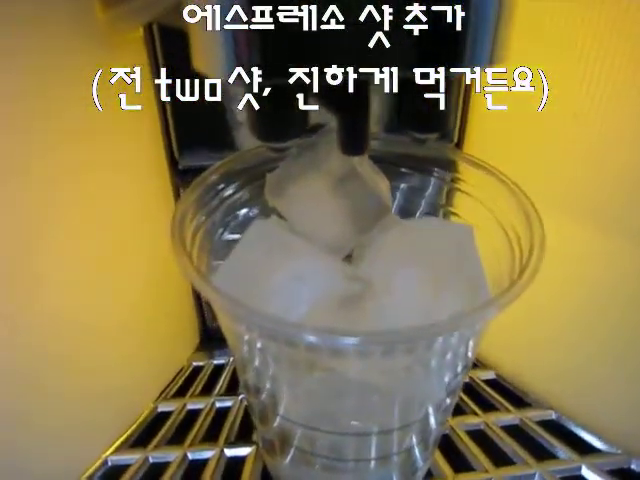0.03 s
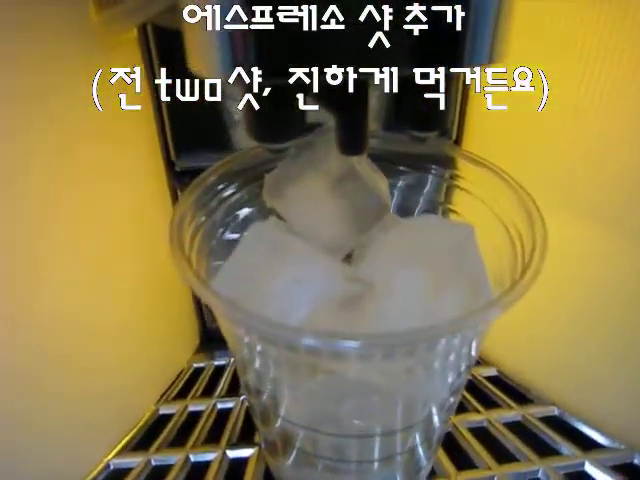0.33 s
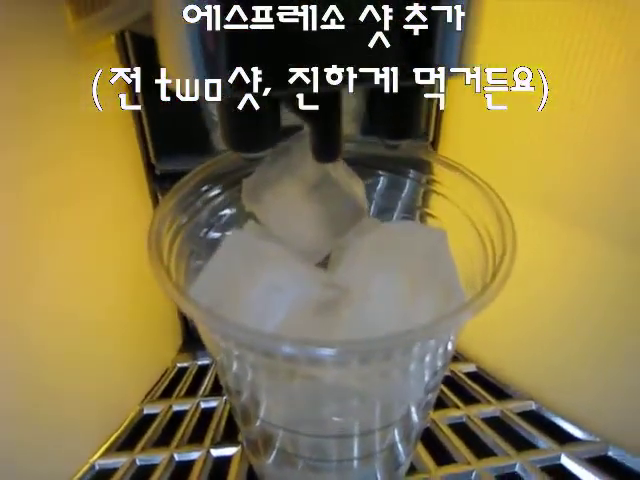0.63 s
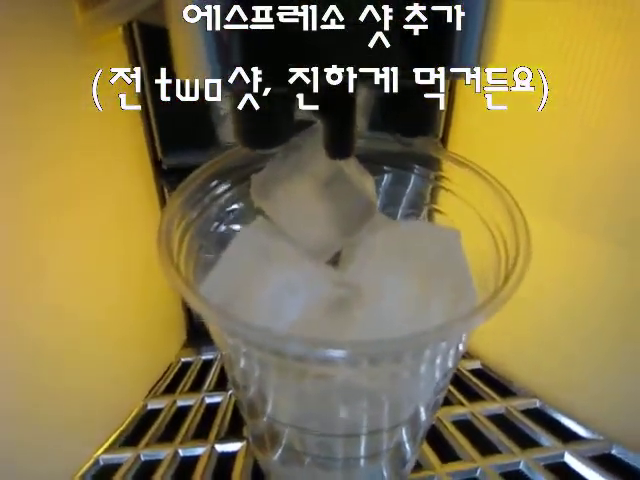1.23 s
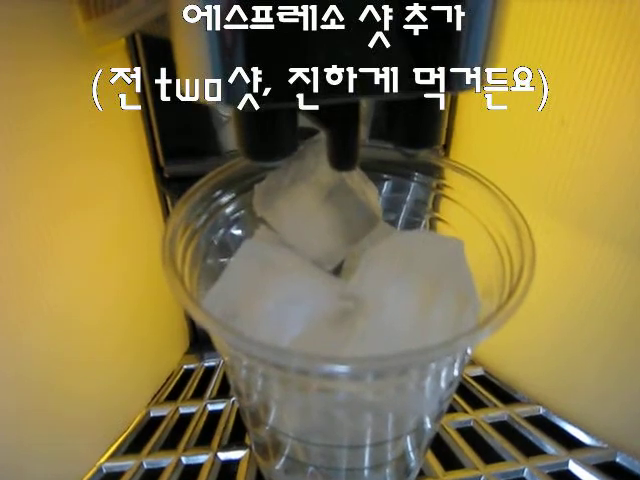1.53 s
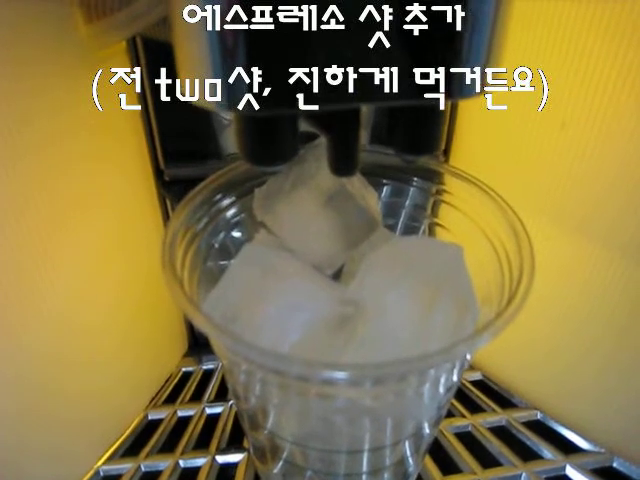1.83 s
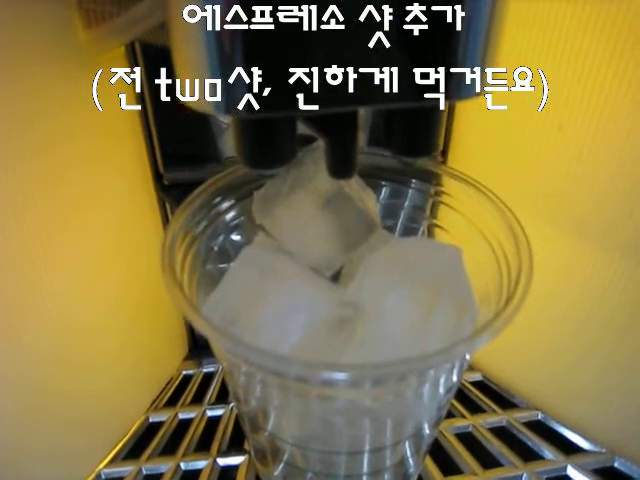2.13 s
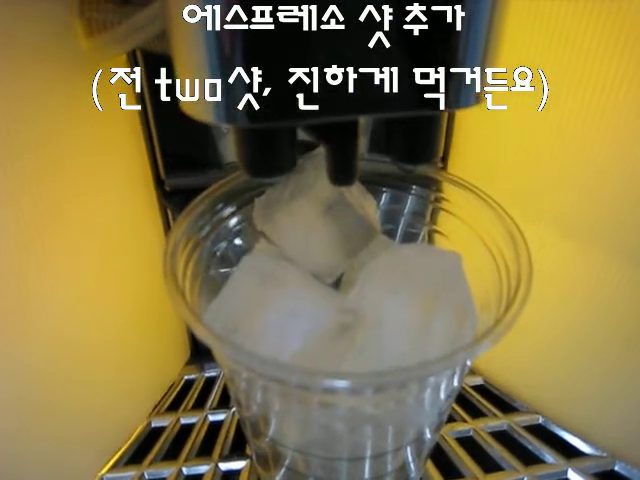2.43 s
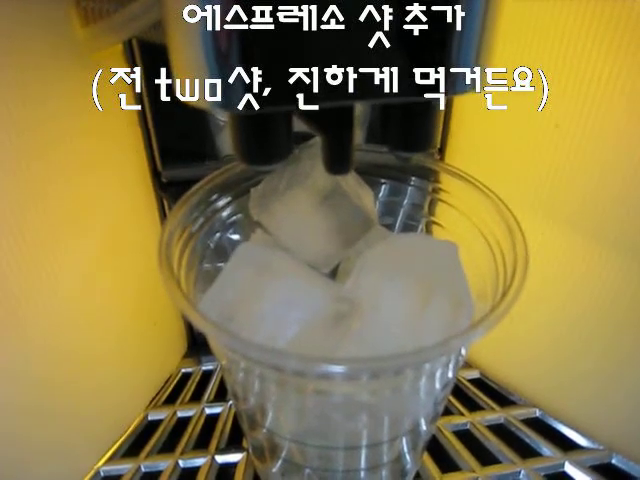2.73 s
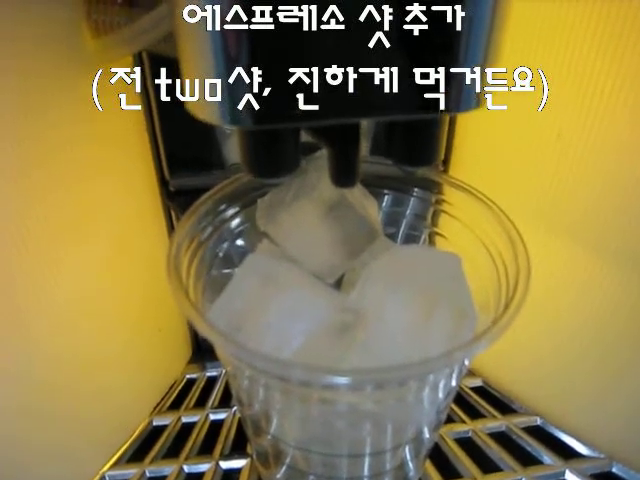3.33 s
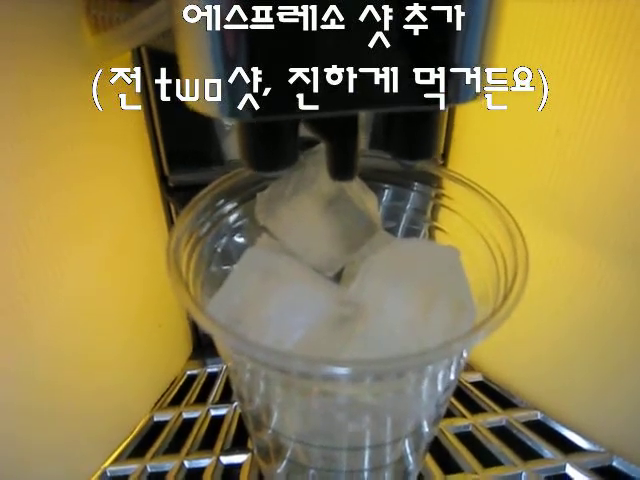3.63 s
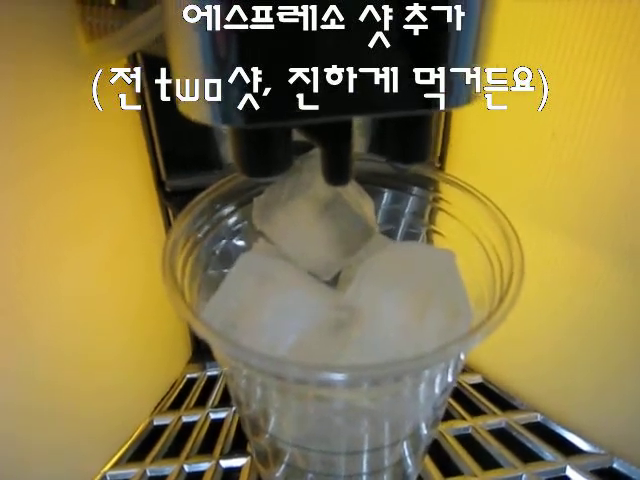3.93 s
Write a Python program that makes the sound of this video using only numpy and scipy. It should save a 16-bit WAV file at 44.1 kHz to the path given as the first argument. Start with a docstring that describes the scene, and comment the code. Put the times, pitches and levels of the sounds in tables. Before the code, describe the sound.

A coffee machine grinds beans with a dense crunch and rough drone, then runs down to a faint fan rush. Latches clunk, a small geared motor whirrs, and one knock follows, heard close up in a small room.

```python
"""A dense crunch of coffee beans and a rough burr drone, heard beside the cup of a bean-to-cup machine.
The grinder runs down, leaving the rush and thin whistle of a cooling fan. Latches click, the brew
unit clunks into motion, and a small geared motor whirrs with buzzing brushes and humming gears;
the unit knocks once more on its way. Crunch and gears ring the plastic housing, the clunks a small room."""
import sys
import numpy as np
from scipy import signal
from scipy.fft import rfft, irfft, next_fast_len
from scipy.io import wavfile
from scipy.ndimage import map_coordinates

SR = 44100
rng = np.random.default_rng(int(sys.argv[2]) if len(sys.argv) > 2 else 0)


def output_pcm(signal):
    """Save a mono or channel-first signal as 16-bit PCM at the path in sys.argv[1].

    Samples are clipped to [-1, 1] before scaling.
    """
    pcm = np.clip(np.atleast_2d(signal).T, -1, 1) * 32767
    wavfile.write(sys.argv[1], SR, np.round(pcm).astype(np.int16))


N = 176400
KNOCK_S = 3.4197  # the brew unit hits a stop


def amp(db):
    """Decibels to gain."""
    return 10 ** (np.asarray(db) / 20)


def unit(x):
    """Scale to rms 1."""
    return x / np.sqrt(np.mean(x ** 2) + 1e-20)


def along(points, hz):
    """Read (f/Hz, value) points at hz, on a log frequency axis."""
    f, values = np.transpose(points)
    return np.interp(np.log(hz + 1), np.log(f + 1), values)


def curves(rows):
    """Automation: one value per sample for each column after the time."""
    times, *columns = np.transpose(rows)
    return [np.interp(np.arange(N) / SR, times, column) for column in columns]


def wobble(rate):
    """Smooth random modulation, rate knots a second."""
    coarse = np.arange(0, N + 64, 64)
    knots = rng.standard_normal(1024)
    return np.interp(np.arange(N), coarse, map_coordinates(knots, [coarse * rate / SR], mode="wrap"))


def coloured(x, colour):
    """Minimum-phase EQ with a gain of colour(hz) dB: resonances ring only after a hit."""
    size = 2 * next_fast_len(N * 2 // 3)
    cepstrum = irfft(np.log(amp(colour(np.fft.rfftfreq(size, 1 / SR)))), size)
    cepstrum[1:size // 2] *= 2
    cepstrum[size // 2 + 1:] = 0
    return irfft(rfft(x, size) * np.exp(rfft(cepstrum)), size)[:N]


def noise(points):
    """Noise of rms 1, shaped by (f/Hz, level/dB) points."""
    return unit(coloured(rng.standard_normal(N), lambda hz: along(points, hz)))


def room(x, wet_db):
    """A small room adds a diffuse tail whose treble dies first."""
    # reverb decay: f/Hz, t60/s
    decay = [(150, 0.55), (1000, 0.18), (4000, 0.13), (12000, 0.086)]
    hz, t, spectra = signal.stft(rng.standard_normal(SR // 2), SR, nperseg=256)
    tail = signal.istft(spectra * amp(-60 * t / along(decay, hz)[:, None]), SR, nperseg=256)[1]
    return x + amp(wet_db) * signal.fftconvolve(x, tail / np.linalg.norm(tail))[:N]


def resonance(hz, centre, width):
    """Bell curve of one resonance, 1 at its centre."""
    return 1 / (1 + (2 * (hz - centre) / width) ** 2)


def housing(hz):
    """Boost in dB where the plastic housing rings."""
    # housing resonances: f/Hz, width/Hz, boost/dB
    modes = [(187, 24, 8), (277, 20, 4), (329, 18, 7), (365, 20, 5), (563, 28, 5), (637, 26, 7),
             (802, 36, 6), (1124, 22, 7), (1178, 32, 6), (1458, 24, 5), (1615, 40, 4), (1723, 26, 6),
             (2290, 110, 5), (2648, 26, 6), (3070, 190, 7), (3620, 320, 6), (7950, 900, 4), (9700, 120, 5)]
    return sum(db * resonance(hz, f, width) for f, width, db in modes)


def ripple(depth_db, spacing_hz=55):
    """Dense, static peaks and dips of the housing, as (f/Hz, level/dB) rows."""
    hz = np.arange(0, SR / 2, spacing_hz)
    return np.transpose([hz, depth_db * np.clip(rng.standard_normal(len(hz)), -2, 1)])


def fan():
    """A cooling fan lays a steady bed of rushing air and a thin, wavering whistle."""
    # air spectrum: f/Hz, level/dB
    air_colour = [(25, -27.5), (174, -16.5), (200, -6), (572, -17.5), (620, -4.5), (1120, -20), (1320, -12),
                  (1550, -21), (1730, -19.5), (15800, -51.5)]
    # fan tones: f/Hz, level/dB
    tones = [(1341.4, -41.5), (455, -46)]
    t = np.arange(N) / SR
    whistle = sum(amp(db + wobble(7.22)) * np.sin(2 * np.pi * hz * t + 0.32 * wobble(20))
                  for hz, db in tones)
    return amp(-36.5) * noise(air_colour) + np.sqrt(2) * whistle


def motor():
    """Brushes buzz at multiples of the shaft speed, each overtone swelling as it glides through a
    resonance; gears hum and whine, sliding parts rub, and the brushes sizzle once a turn."""
    # shaft speed: t/s, f/Hz
    shaft_speed = [(2.66, 94), (2.72, 96.8), (2.79, 96.3), (2.85, 98.5), (2.96, 98.6), (3.0, 100),
                   (3.08, 100.7), (3.17, 100.1), (3.26, 100.8), (3.33, 103.5), (3.4, 105.2), (3.5, 105.8),
                   (3.68, 107), (3.8, 105.8), (3.88, 104.7)]
    # faders: t/s, whirr level/dB, gear hum level/dB, whistle level/dB
    faders = [(2.55, -90, -90, -90), (2.58, -45, -60, -80), (2.72, -36.5, -31.5, -51),
              (2.86, -36, -31, -47), (2.96, -36, -32.5, -46), (3.08, -36, -31.5, -43),
              (3.23, -36, -29.5, -44), (3.33, -36, -34, -51), (3.5, -36, -40, -47), (3.7, -37, -40, -45),
              (3.8, -36.5, -36.5, -47), (3.86, -36, -35, -53), (4.0, -35, -34, -52)]
    # low gear hum and higher whine: multiples of the shaft speed
    hum_orders = [5, 6, 7, 8, 9]
    whine_orders = [16, 24, 30, 41]
    # trim of each of those tones: level/dB before the knock, level/dB after it
    hum_trims = [(-12, -5), (-22, -12), (-1.5, -1), (-5.5, -10), (-11, -19)]
    whine_trims = [(-18, -15.5), (-12.5, -18.5), (-18.5, -32), (-37, -35)]
    # spectra of the brush buzz and the sliding parts: f/Hz, level/dB
    buzz_colour = [(100, 11), (450, -3), (1000, 9), (1700, 4), (2600, 10), (3600, 3.5), (5000, 10),
                   (6400, -3.5), (8000, 2), (10500, -5.5), (15800, 0)]
    rub_colour = [(40, -23), (371, -17.5), (453, 8), (582, -11), (710, -2.5), (1030, -24), (1360, -25),
                  (1540, -16.5), (4880, -24.5), (15800, -40)]
    # motor casing resonances: f/Hz, boost/dB
    casing_modes = [(6800, 5), (8050, 5), (8550, 5), (9200, 10), (10170, 12), (11750, 13), (15100, 6)]
    start_s, jitter_rad, waver_db = 2.55, 0.0039, 2
    whistle_order, teeth, teeth_boost_db = 48, 8, 9.5  # multiples of the tooth count stand out

    start = round(start_s * SR)
    t = np.arange(start, N) / SR
    speed, whirr_db, hum_db, whistle_db = [c[start:] for c in curves(shaft_speed) + curves(faders)]
    angle = 2 * np.pi * np.cumsum(speed) / SR + jitter_rad * wobble(100)[start:]

    def tone(order, db):
        """A partial locked to the shaft."""
        return np.sqrt(2) * amp(db) * np.sin(order * angle + 2 * np.pi * rng.random())

    def gears(orders, trims):
        """Meshing teeth sing through the housing; their balance shifts at the knock."""
        mesh = 0
        for order, trim in zip(orders, trims):
            trim_db = np.interp(t, [KNOCK_S - .05, KNOCK_S], trim)
            mesh += tone(order, trim_db + housing(order * speed) + waver_db * wobble(40)[start:])
        return mesh

    hz, ripple_db = ripple(depth_db=5.5).T
    casing_db = sum(db * resonance(hz, f, width=104) for f, db in casing_modes)
    eq_db = along(buzz_colour, hz) + ripple_db + casing_db
    buzz = sum(tone(k, np.interp(k * speed, hz, eq_db) + teeth_boost_db * (k % teeth == 0))
               for k in range(2, 155) if k not in hum_orders + whine_orders + [whistle_order])
    rub = noise(rub_colour)[start:] * (1 + .5 * np.sin(angle))
    hiss = noise([(3000, -16), (8000, 2), (13000, -3)])[start:]
    sizzle = unit(hiss * np.exp(np.cos(angle)))
    whine = gears(whine_orders, whine_trims)
    hum = gears(hum_orders, hum_trims)
    whirr = amp(-4.5) * unit(buzz) + whine + amp(-2.0) * rub + amp(-11.5) * sizzle
    return np.pad(amp(whirr_db) * whirr + amp(hum_db) * hum + tone(whistle_order, whistle_db), (start, 0))


def blows(rows, colour, rattle_db):
    """Each blow (t/s, level/dB, t60/s) is a sharp push followed by a short rattle."""
    track, t = np.zeros(N + SR), np.arange(SR // 4) / SR
    for onset, db, t60 in rows:
        hit = rng.standard_normal(len(t)) * amp(-60 * t / t60)
        hit *= amp(rattle_db) / np.linalg.norm(hit)
        hit[0] += 1  # the push
        track[round(onset * SR):][:len(t)] += amp(db) * hit / np.linalg.norm(hit)
    eq_power = np.mean(amp(along(colour, np.linspace(0, SR / 2, 2048))) ** 2)
    return coloured(track[:N], lambda hz: along(colour, hz)) / np.sqrt(eq_power)


def knock(snap_db=-17.5, snap_t60_s=0.029):
    """The moving unit hits a stop: a bright snap and a few quickly damped modes."""
    # ring of the stop: f/Hz, level/dB, t60/s
    modes = [(490, -8, .04), (1130, -13, .025), (2230, -11, .024), (3980, -9, .013)]
    t = np.maximum(np.arange(N) / SR - KNOCK_S, 0)
    ring = sum(amp(db - 60 * t / t60) * np.sin(2 * np.pi * hz * t) for hz, db, t60 in modes)
    snap = amp(snap_db - 60 * t / snap_t60_s) * (t > 0) * rng.standard_normal(N)
    return ring + snap


def brew_unit():
    """Dull thuds of the frame, bright clicks of the latches, and loose parts chattering after."""
    # hits: t/s, relative thud level/dB, relative click level/dB, click t60/s (thuds last twice as long)
    hits = [(2.567, 1.5, -10, 0.052), (2.573, -8, -6.5, 0.13), (2.608, 4, -8.5, 0.059),
            (2.622, -20, -11, 0.089), (2.6477, 9.5, -6.5, 0.026), (2.655, 6.5, -5, 0.052),
            (2.661, 3.5, -6, 0.025), (2.681, 3, -20, 0.049), (3.4194, 2, 0.5, 0.018),
            (3.4245, 2, -5, 0.023), (3.438, -2, -11, 0.042)]
    # chatter after each clunk: t/s, level/dB
    chatter_fader = [(2.65, -63), (2.69, -31), (2.74, -27), (2.85, -49), (3.41, -94), (3.43, -20.5),
                     (3.475, -28), (3.505, -23.5), (3.54, -25.5), (3.58, -34), (3.8, -64)]
    # spectra of frame, latches and loose parts: f/Hz, level/dB
    thud_colour = [(30, -24), (100, -19.5), (200, 0.5), (330, -3), (500, 5), (750, -2.5), (1300, -16),
                   (3000, -29.5), (15000, -66)]
    click_colour = [(100, -9), (500, 6), (1100, 7.5), (2100, 3), (4000, -5.5), (9000, -15), (15800, -24)]
    chatter_colour = [(50, -31), (150, -0.5), (260, 1), (550, 3.5), (1000, -6.5), (2300, -13.5),
                      (4000, -22.5), (15000, -57)]
    thuds = amp(4.5) * blows([(s, db, 2 * t60) for s, db, _, t60 in hits], thud_colour, rattle_db=0.5)
    clicks = amp(8.0) * blows([(s, db, t60) for s, _, db, t60 in hits], click_colour, rattle_db=22.0)
    chatter_db, = curves(chatter_fader)
    chatter = amp(chatter_db + 1.3 * wobble(180)) * noise(chatter_colour)
    return room(thuds, wet_db=-7.0) + room(clicks + knock(), wet_db=-14.5) + chatter


def burrs(roughness_rad=0.99, flutter_db=3.8):
    """The grinding burrs drone roughly, sagging under load and diving in pitch as they run down."""
    # drone: t/s, f/Hz, level/dB relative to the grinder
    drone = [(0, 590, -26), (.25, 635, -4.5), (.45, 550, -12.5), (.75, 635, -7), (1.2, 560, -12),
             (1.65, 565, -7), (1.88, 630, -3), (2.03, 575, -9.5), (2.09, 515, 3.5), (2.16, 430, -14),
             (2.26, 230, -14)]
    hz, db = curves(drone)
    phase = 2 * np.pi * np.cumsum(hz) / SR + roughness_rad * wobble(60)
    return amp(db) * unit(amp(flutter_db * wobble(70)) * np.sin(phase))


def grinder():
    """Cracking beans and rubbing burrs ring the housing; the crunch surges on hard beans, fades first."""
    # grinder drive: t/s, level/dB
    drive_fader = [(0, -18.5), (1.5, -18.5), (2.12, -19), (2.17, -20.5), (2.25, -25.5), (2.36, -39.5),
                   (2.5, -53)]
    # grinding spectrum: f/Hz, level/dB
    grind_colour = [(40, -61), (90, -29), (133, -19.5), (184, -5.5), (248, -12.5), (353, -5.5),
                    (400, -10.5), (450, -1), (627, -4), (912, -6), (1140, -9.5), (1330, -14.5),
                    (2400, -14.5), (2900, -22.5), (4300, -29.5), (6600, -32), (9700, -38), (11500, -46),
                    (15800, -49.5)]
    # trim of the crunch against the rumble: t/s, level/dB
    crunch_fader = [(0, 2), (.68, 1), (1.9, 1), (2.13, -2), (2.15, -9)]
    # surges on hard beans: t/s, boost/dB
    hard_beans = [(.09, 3.5), (0.579, 4), (0.681, 3.5), (.9, 0.5), (1.421, 1)]
    cracks_per_s, spread_db, crack_share = 1500, 2.5, 0.35
    surge_decay_s, crossover_hz = .04, 1080  # rumble below the crossover, crunch above

    t = np.arange(N) / SR
    drive_db, = curves(drive_fader)
    crunch_db, = curves(crunch_fader)
    surge_db = sum(db * (t > s) * np.exp(-np.abs(t - s) / surge_decay_s) for s, db in hard_beans)
    impulses = (rng.random(N) < cracks_per_s / SR) * rng.choice([-1, 1], N)
    cracks = impulses * amp(spread_db * np.minimum(rng.exponential(size=N), 4))
    rub = rng.standard_normal(N)
    force = np.sqrt(crack_share) * unit(cracks) + np.sqrt(1 - crack_share) * rub
    body = unit(coloured(force, lambda hz: along(grind_colour, hz) + housing(hz)))
    rumble = signal.sosfiltfilt(signal.butter(2, crossover_hz, fs=SR, output="sos"), body)
    crunch = (body - rumble) * amp(crunch_db + surge_db + wobble(60))
    crunch = coloured(crunch, lambda hz: along(ripple(depth_db=2.5), hz))
    return amp(drive_db) * (rumble * amp(surge_db / 2) + crunch + burrs())


def scene():
    """The whole machine, mixed to mono."""
    return (grinder() + motor() + brew_unit() + fan())[None]


def record(dry):
    """A soft clip rounds the highest peaks and a brick-wall low-pass takes off the very top."""
    ceiling, top_hz = .78, 15850
    rounded = dry / (1 + np.abs(dry / ceiling) ** 6) ** (1 / 6)
    size = next_fast_len(N + SR // 2)
    passband = np.fft.rfftfreq(size, 1 / SR) < top_hz
    return irfft(rfft(rounded, size) * passband, size)[..., :N]


dry = scene()
out = record(dry)
output_pcm(out)
```